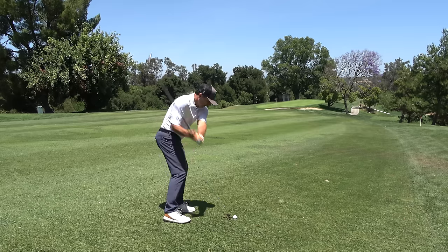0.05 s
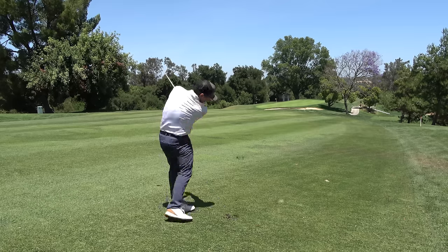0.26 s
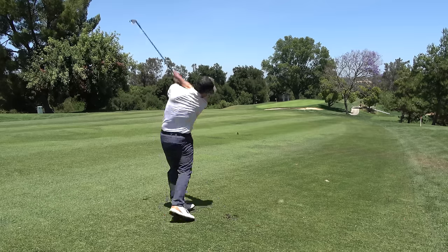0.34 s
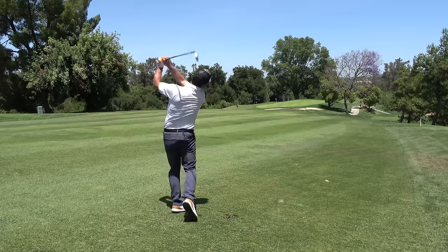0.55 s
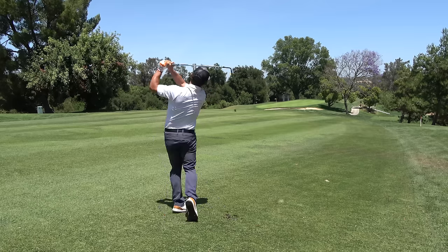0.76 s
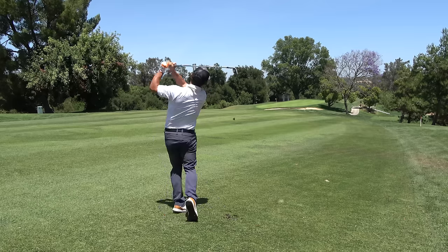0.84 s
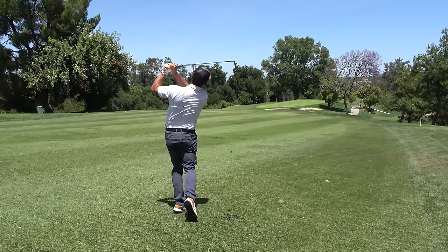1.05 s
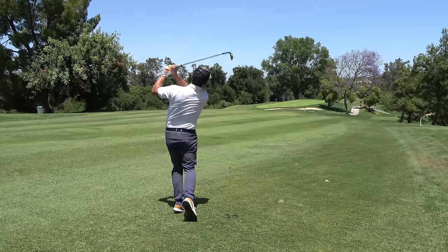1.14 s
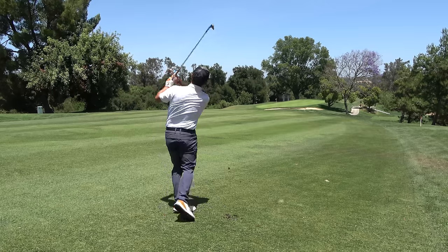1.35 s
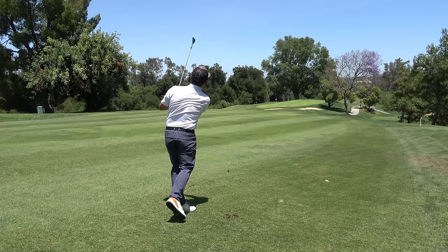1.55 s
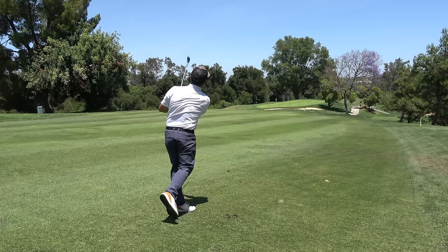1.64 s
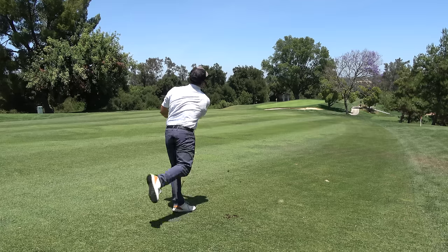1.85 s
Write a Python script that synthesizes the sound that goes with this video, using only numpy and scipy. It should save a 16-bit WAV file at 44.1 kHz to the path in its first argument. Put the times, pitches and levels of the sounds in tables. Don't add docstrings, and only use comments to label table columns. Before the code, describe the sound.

Single hard golf shot: faint swish, loud dry click of iron on ball, low body rumble

```python
import sys
import numpy as np
from scipy import signal
from scipy.fft import rfft, irfft, next_fast_len
from scipy.io import wavfile
from scipy.ndimage import map_coordinates

SR = 44100
rng = np.random.default_rng(int(sys.argv[2]) if len(sys.argv) > 2 else 0)


def convert_level_to_amplitude(level_db):
    exponent = np.asarray(level_db, float) / 20
    return 10 ** exponent


def wav_record(signal):
    frames = np.transpose(np.atleast_2d(signal))
    bounded = np.clip(frames, -1, 1)
    quanta = np.round(bounded * 32767).astype(np.int16)
    wavfile.write(sys.argv[1], SR, quanta)


N = 83790

# frequency in Hz, level in dB, 60 dB decay time in s.
FACE_MODES = [(1330, 11.5, .014), (1965, 0, .008), (2250, 9, .010), (3170, 3.5, .004)]
# frequency in Hz, level in dB, decay time in s.
HEAD_MODES = [(2580, -20, .012), (3020, -25, .012), (3480, -18, .02), (4600, -27, .016), (5400, -26, .016),
              (7700, -31, .007), (10400, -31, .007)]
# frequency in Hz, density in dB.
TURF_COLOUR = [(200, -12), (420, 0), (900, -11), (2000, -18), (3300, -10), (5200, -24), (6500, -33),
               (16000, -42)]
# time in s, level in dB, shedding pitch in Hz.
SHAFT_SPEED = [(.19, -72, 300), (.218, -51, 420), (.24, -41, 520), (.258, -38, 616.8), (.275, -38, 480),
               (.3, -50, 380), (.345, -60, 299.5), (.4, -75, 280)]
# start in s, rise in s, fall in s, level in dB.
CLOTH_DRAGS = [(.05, 0.029, 0.037, -61.5), (.09, .03, .02, -53), (.118, .022, .018, -54),
               (.215, .043, .025, -50.5), (.311, .007, .010, -42), (.333, .017, .014, -43),
               (.355, .022, .022, -54), (.42, 0.0044, .008, -56.5), (.435, 0.021, .04, -61),
               (.51, .012, .025, -71), (1.299, .25, 0.39, -73), (1.65, 0.11, 0.15, -73),
               (.27, .015, .03, -57), (.195, .008, .01, -62)]
# frequency in Hz, density in dB per Hz.
CLOTH_COLOUR = [(290, -29.5), (500, -1.5), (1030, -13.5), (1120, -6), (1300, -13), (4060, -15.5),
                (7770, -27.5), (15800, -47.5)]
# time in s, peak level in dB, pitch in Hz.
CREASE_SNAPS = [(0.2009, -42, 3010), (0.2064, -49, 3160), (1.0274, -58, 3980), (1.3424, -57, 4520),
                (1.3932, -45, 3950), (1.4536, -52, 3970), (1.4664, -59, 4360), (1.4775, -47, 3440),
                (1.515, -57.5, 3970), (1.5264, -47, 3770), (1.5569, -51, 3810), (1.5768, -48, 4500),
                (1.5944, -53, 3310), (1.6357, -52, 3630), (1.6626, -54, 3630), (1.6926, -52, 4830),
                (1.7034, -57, 3530), (1.7274, -56, 3050), (1.7459, -54, 3580), (1.7674, -49.5, 4240),
                (1.7774, -52, 3440), (1.7888, -51, 3250), (1.8064, -58, 4600), (1.8214, -58, 4190),
                (1.8554, -59, 3560), (1.8894, -60, 3770)]
# time in s, peak level in dB, pitch in Hz.
GRIP_SNAP = (.156, -35, 1540)
# centre in s, peak level in dB, pitch in Hz, phase lean in rad.
BODY_JOLTS = [(.085, -34, 30, 0), (.228, -29, 28, 0), (.287, -22, 45, 3.1), (.34, -15, 37, 1.6),
              (.415, -25, 55, 0), (.442, -25, 70, 0), (.492, -26, 60, 0), (.516, -23, 45, 0),
              (.575, -37, 48, 0), (1.282, -39, 50, 3.1), (.68, -43, 35, 0), (.278, -27, 100, 0),
              (1.274, -36, 55, .8), (1.705, -38, 30, 3.1), (1.818, -42, 45, 0)]
# time in s, level in dB.
BUFFET_STRENGTH = [(0, -56), (.02, -45), (.074, -50), (.126, -42), (.206, -45), (.264, -37), (.344, -35),
                   (.386, -40), (.418, -35), (.52, -38), (.548, -49), (.92, -61), (1.1, -60), (1.15, -53),
                   (1.22, -57), (1.35, -49), (1.55, -57), (1.9, -58)]
# frequency in Hz, density in dB.
RUMBLE_COLOUR = [(10, -25), (20, 0.5), (40, 1), (90, -9), (180, -14), (300, -22), (800, -34), (1600, -60)]
# frequency in Hz, density in dB per Hz.
AIR_COLOUR = [(59, -27), (100, 1.5), (214, -20), (489, -23), (748, -28.5), (1140, -30), (1320, -33),
              (1570, -30), (15800, -50.5)]
# frequency in Hz, density in dB per Hz.
HISS_COLOUR = [(300, -20), (1000, 0), (5000, -3), (16000, -8)]

HIT_S, HIT_RISE_S = .25896, .002
CRACK_DB, CRACK_T60_S = -23, .01
GROUND_DELAY_S, GROUND_DB, GROUND_RISE_S, GROUND_TILT_DB = .0011, -6.5, .0009, 2
TURF_S, TURF_LENGTH_S, TURF_DB, TURF_FALL_DB = .261, .0092, -25, 3
THUD_HZ, THUD_DB = 530, -13
CLOTH_GRAIN_DB = 2.5
SNAP_CYCLES, SNAP_EDGE = 1.05, .07
FINE_FROM_S, FINE_DB, FINE_SPREAD_DB = 1.3, -63, 3.5
BUMP_S, BUMP_DB, BUMP_HZ = 1.7758, -39, 230
JOLT_CYCLES = .55
LUMPY_DB, LUMPS_PER_S = 3, 24
AIR_DB, AIR_FOLLOWS, HISS_DB = -59, 0.3, -80
TRILL_S, TRILL_PER_S, TRILL_DB, TRILL_FADE_DB = .608, 20.8, -65, 5
NOTE_S, NOTE_HZ, DROP_HZ, BLUR_HZ = .036, 3930, 450, 190
TREES_T60_S, TREES_DB = .08, -4
FADE_IN_S, CEILING, TOP_HZ = 0.02, .71, 15800


def unit(x):
    return x / np.sqrt(np.mean(x ** 2) + 1e-20)


def curves(rows):
    s, *columns = np.transpose(rows)
    return [np.interp(np.arange(N) / SR, s, column) for column in columns]


def wobble(rate):
    return map_coordinates(rng.standard_normal(N // 8), [np.arange(N) * rate / SR])


def noise(points):
    m = next_fast_len(N + 8192)
    f, db = np.transpose(points)
    log_hz = np.log(np.fft.rfftfreq(m, 1 / SR) + 1)
    gain = convert_level_to_amplitude(np.interp(log_hz, np.log(f + 1), db))
    return unit(irfft(rfft(rng.standard_normal(m)) * gain, m)[:N])


def since(s):
    return np.maximum(np.arange(N) / SR - s, 0)


def ringing(t, modes, tilt_db=0):
    total = 0
    for hz, db, t60 in modes:
        octaves = np.log2(hz / modes[0][0])
        total = total - convert_level_to_amplitude(db + tilt_db * octaves - 60 * t / t60) * np.sin(2 * np.pi * hz * t)
    return total


def blow(s, rise, tilt_db):
    t = since(s)
    colour = [(1500, -30), (4500, 0), (6500, -14), (9500, -10), (16000, -22)]
    crack = convert_level_to_amplitude(CRACK_DB - 60 * t / CRACK_T60_S) * noise(colour)
    return (1 - np.exp(-t / rise)) * (ringing(t, FACE_MODES, tilt_db) + crack)


def ball_strike():
    direct = blow(HIT_S, HIT_RISE_S, 0)
    reflected = blow(HIT_S + GROUND_DELAY_S, GROUND_RISE_S, GROUND_TILT_DB)
    return direct + convert_level_to_amplitude(GROUND_DB) * reflected


def turf_cut():
    t = since(TURF_S)
    u = t / TURF_LENGTH_S
    contact = np.clip(u * 8, 0, 1) * np.clip((1 - u) * 12, 0, 1)
    tear = convert_level_to_amplitude(TURF_DB - TURF_FALL_DB * u + 3 * wobble(900)) * contact * noise(TURF_COLOUR)
    thud_level = convert_level_to_amplitude(THUD_DB - 9 * u - 14 * np.maximum(u - 1, 0)) * u / (u + .4)
    thud = thud_level * np.sin(2 * np.pi * THUD_HZ * t)
    return tear + thud + np.clip(u * 11, 0, 1) * ringing(t, HEAD_MODES)


def swish():
    db, hz = curves(SHAFT_SPEED)
    phase = 2 * np.pi * np.cumsum(hz * (1 + .16 * wobble(140))) / SR
    tone = convert_level_to_amplitude(3 * wobble(160)) * np.sin(phase)
    turbulence = noise([(100, -32), (350, -4), (900, -2), (3000, -23), (16000, -61.5)])
    moving = since(SHAFT_SPEED[0][0]) > 0
    return convert_level_to_amplitude(db) * moving * (tone + .8 * turbulence)


def cloth():
    envelope = 0
    for s, rise, fall, db in CLOTH_DRAGS:
        t = since(s)
        decay = np.exp(-2.2 * ((t - rise) / fall) ** 1.5)
        envelope = envelope + convert_level_to_amplitude(db) * np.where(t < rise, (t / rise) ** 1.5, decay)
    grain_db = CLOTH_GRAIN_DB * wobble(500) + 2.4 * wobble(110)
    return envelope * unit(convert_level_to_amplitude(grain_db) * noise(CLOTH_COLOUR))


def snaps():
    out = np.zeros(N + SR)
    t = np.arange(SR // 100) / SR
    fine = []
    for a, b, c in rng.random((30, 3)):
        s = FINE_FROM_S + (N / SR - FINE_FROM_S) * a
        fine.append((s, FINE_DB - FINE_SPREAD_DB * np.log(b), 3200 + 4500 * c))
    bump_click = (BUMP_S + .0012, BUMP_DB - 10, 1700)
    for s, db, hz in [GRIP_SNAP, bump_click, *CREASE_SNAPS, *fine]:
        u = t * hz / SNAP_CYCLES
        pulse = np.sin(2 * np.pi * hz * t) * np.e * 3 * u * np.exp(-3 * u)
        edge = SNAP_EDGE * rng.standard_normal(len(t)) * convert_level_to_amplitude(-60 * t / .003)
        out[round((s + .001) * SR):][:len(t)] += convert_level_to_amplitude(db + 1.2) * (pulse + edge)
    return out[:N]


def capsule_bump():
    u = since(BUMP_S) * BUMP_HZ
    return -convert_level_to_amplitude(BUMP_DB) * np.sin(2 * np.pi * u ** 0.82) * np.exp(-1.6 * u)


def body_jolts():
    total = 0
    for s, db, hz, lean in BODY_JOLTS:
        t = np.arange(N) / SR - s
        packet = np.exp(-(t * hz / JOLT_CYCLES) ** 2)
        total = total + convert_level_to_amplitude(db) * packet * np.cos(2 * np.pi * hz * t + lean)
    return total


def bird():
    t = since(TRILL_S)
    k = np.floor(t * TRILL_PER_S)
    u = np.clip((t - k / TRILL_PER_S) / NOTE_S, 0, 1)
    hz = NOTE_HZ - DROP_HZ * np.sqrt(u) + BLUR_HZ * wobble(260)
    level_db = TRILL_DB - TRILL_FADE_DB * t / 0.37 - 4 * u + 1.8 * wobble(110)
    level = convert_level_to_amplitude(level_db) * np.sin(np.pi * u) ** 0.38 * (k < 9)
    song = level * np.sin(2 * np.pi * np.cumsum(hz) / SR)
    tail_t = np.arange(SR // 2) / SR
    tail = rng.standard_normal(SR // 2) * convert_level_to_amplitude(-60 * tail_t / TREES_T60_S)
    return song + convert_level_to_amplitude(TREES_DB) * signal.fftconvolve(song, tail / np.linalg.norm(tail))[:N]


def wind():
    strength_db, = curves(BUFFET_STRENGTH)
    rumble = unit(convert_level_to_amplitude(LUMPY_DB * wobble(LUMPS_PER_S)) * noise(RUMBLE_COLOUR))
    air_db = AIR_DB + AIR_FOLLOWS * (strength_db + 58) + 1.4 * wobble(11)
    air = convert_level_to_amplitude(air_db) * noise(AIR_COLOUR)
    return convert_level_to_amplitude(strength_db + 2.5) * rumble + air + convert_level_to_amplitude(HISS_DB) * noise(HISS_COLOUR)


def scene():
    club = ball_strike() + turf_cut() + swish()
    player = cloth() + snaps() + capsule_bump() + body_jolts()
    return (club + player + bird() + wind())[None]


def roll_off(x):
    return signal.sosfilt(signal.butter(12, 15920, fs=SR, output="sos"), x)


def record(dry):
    x = dry * np.clip(since(0) / FADE_IN_S + .08, 0, 1) ** 1.3
    x = x / (1 + np.abs(x / CEILING) ** 12) ** (1 / 12)
    passband = np.fft.rfftfreq(N, 1 / SR) < TOP_HZ
    x = irfft(rfft(x) * passband, N)
    return roll_off(x)


dry = scene()
out = record(dry)
wav_record(out)
```